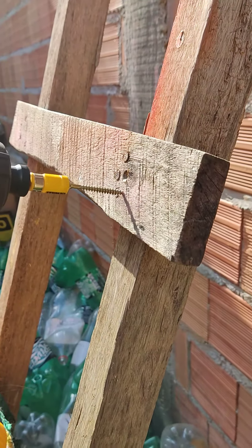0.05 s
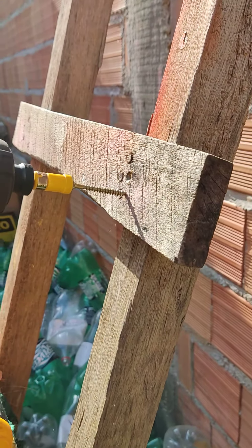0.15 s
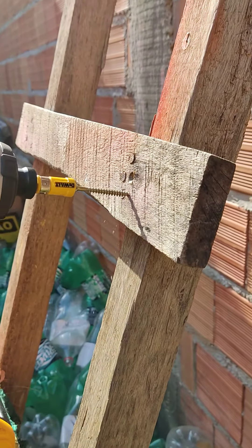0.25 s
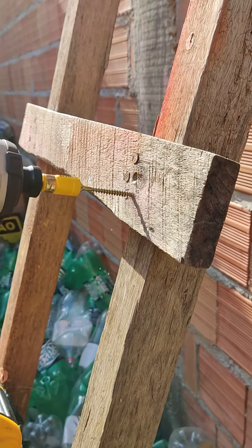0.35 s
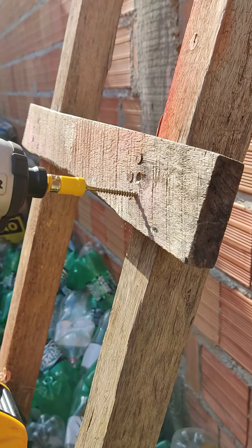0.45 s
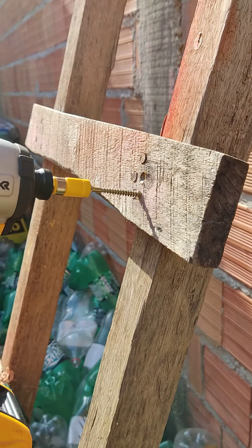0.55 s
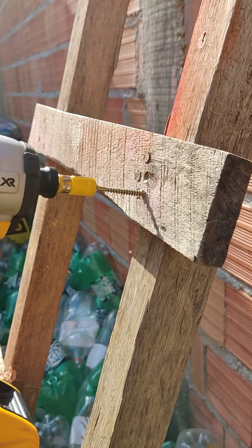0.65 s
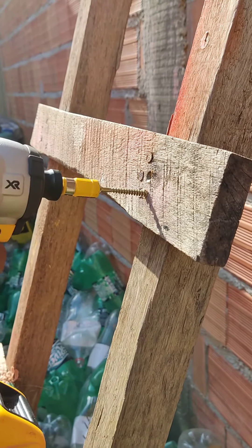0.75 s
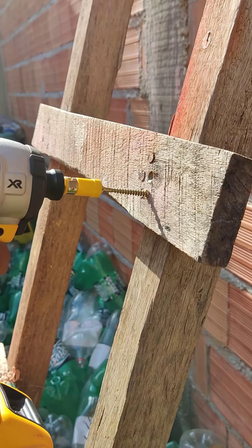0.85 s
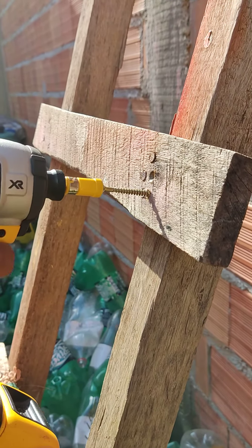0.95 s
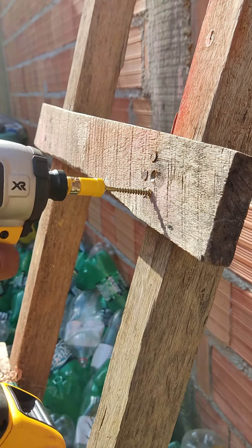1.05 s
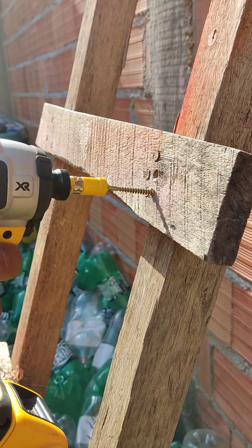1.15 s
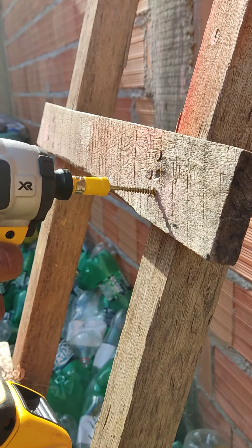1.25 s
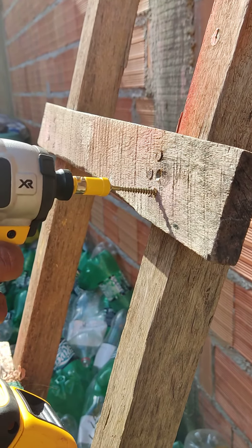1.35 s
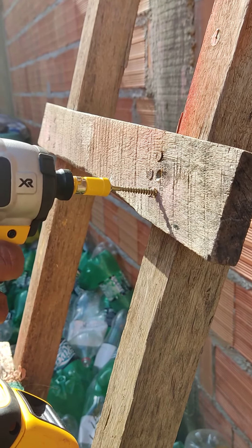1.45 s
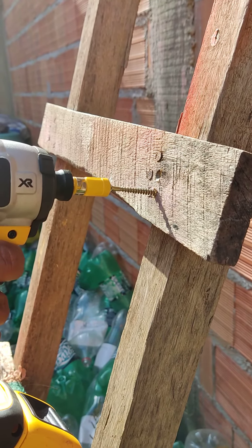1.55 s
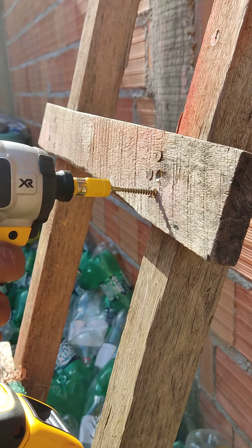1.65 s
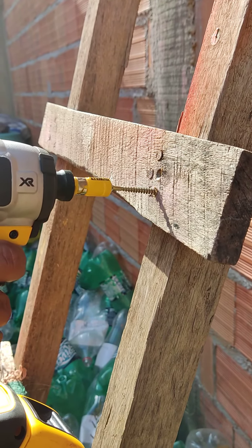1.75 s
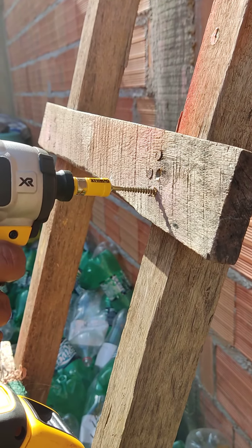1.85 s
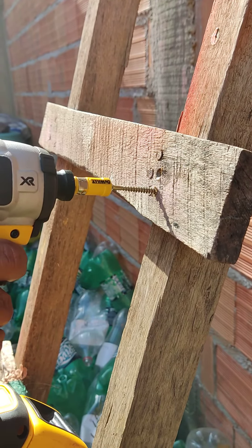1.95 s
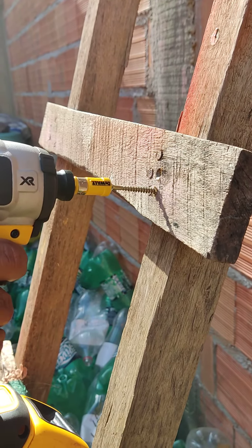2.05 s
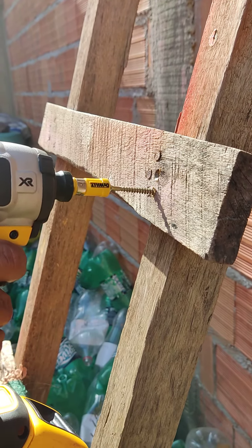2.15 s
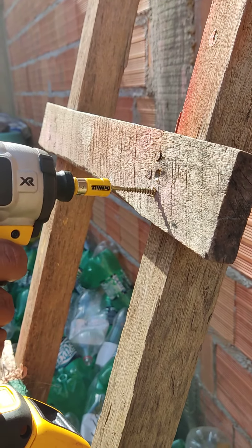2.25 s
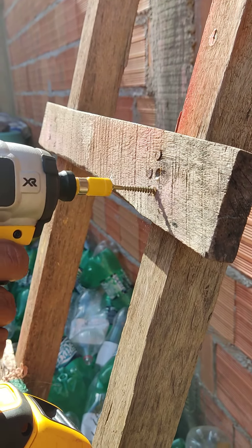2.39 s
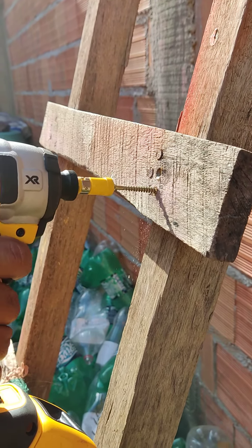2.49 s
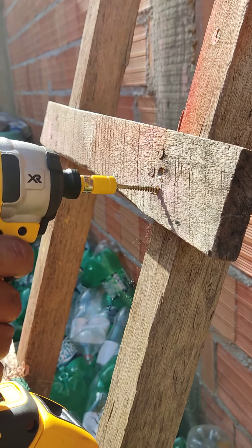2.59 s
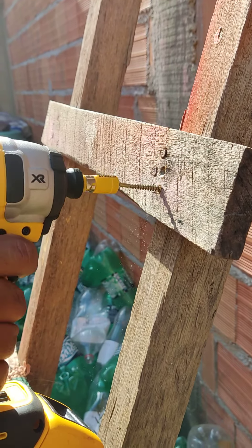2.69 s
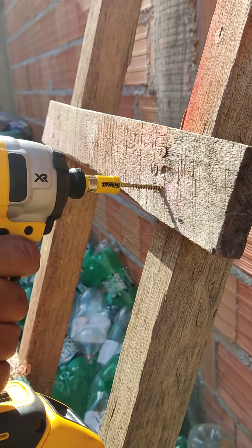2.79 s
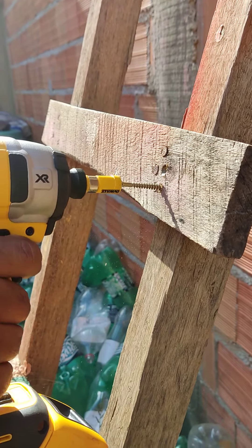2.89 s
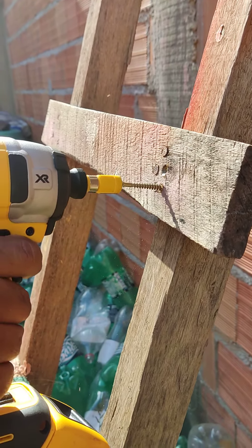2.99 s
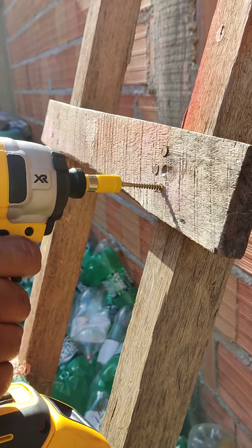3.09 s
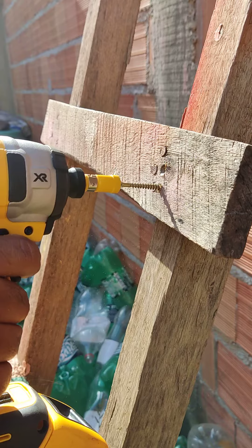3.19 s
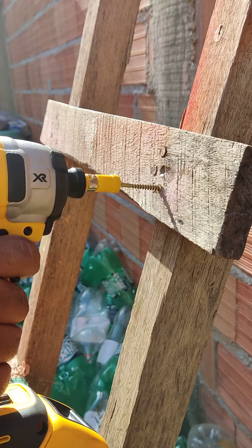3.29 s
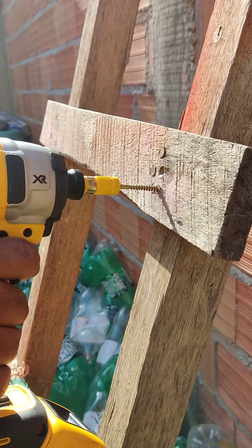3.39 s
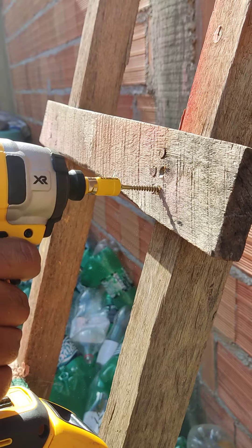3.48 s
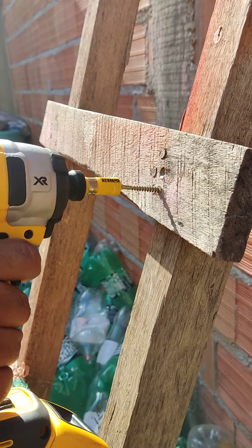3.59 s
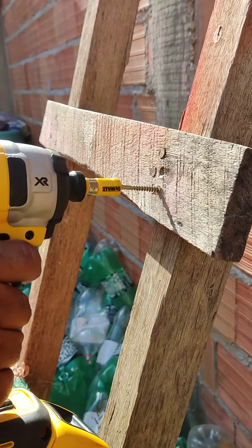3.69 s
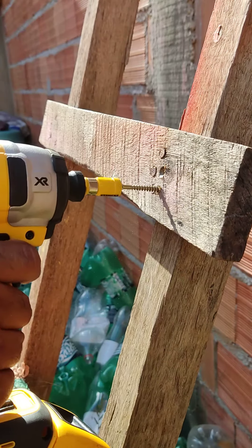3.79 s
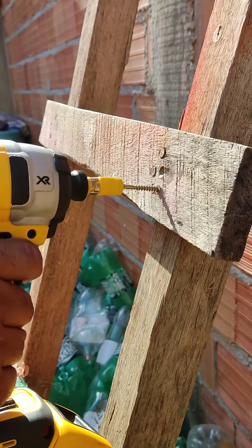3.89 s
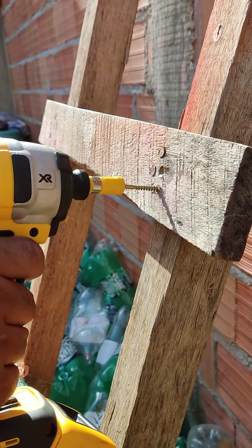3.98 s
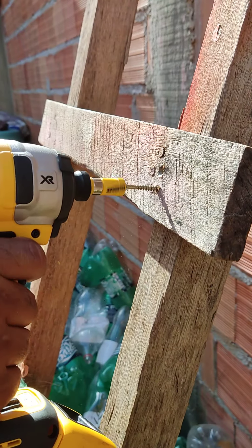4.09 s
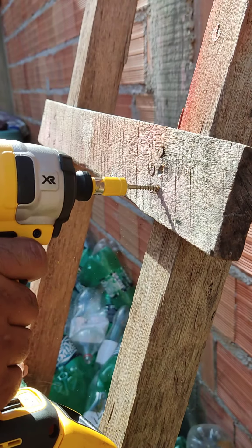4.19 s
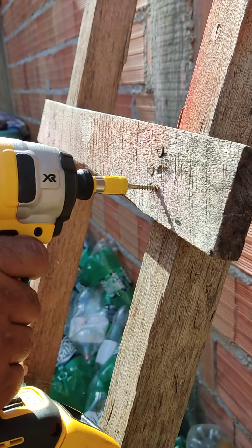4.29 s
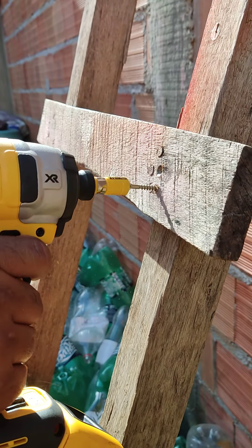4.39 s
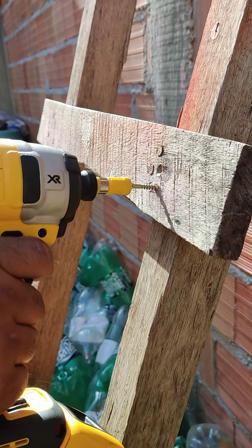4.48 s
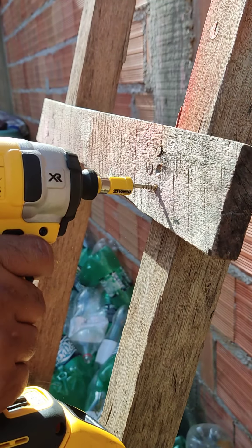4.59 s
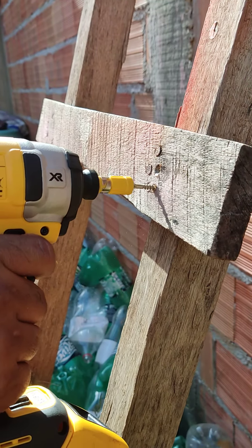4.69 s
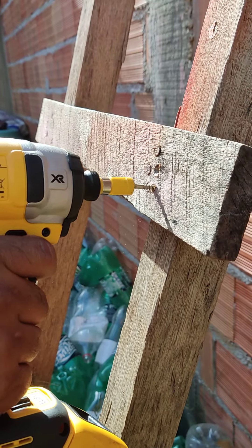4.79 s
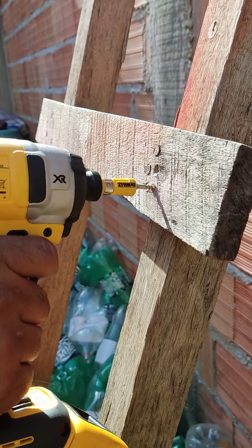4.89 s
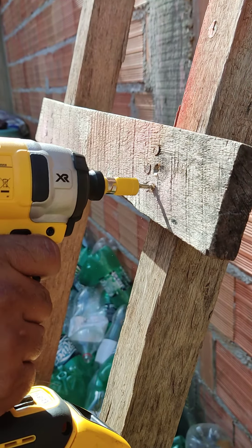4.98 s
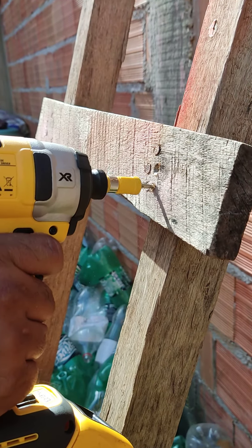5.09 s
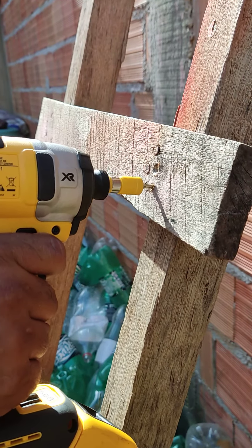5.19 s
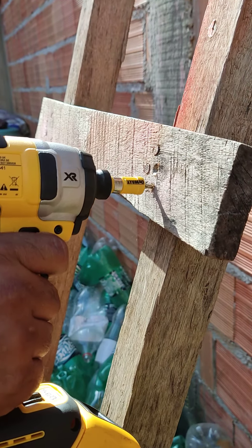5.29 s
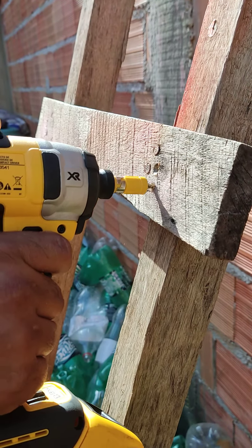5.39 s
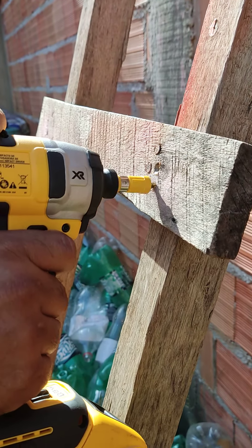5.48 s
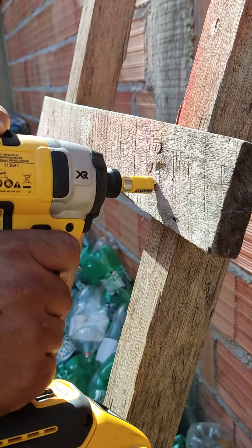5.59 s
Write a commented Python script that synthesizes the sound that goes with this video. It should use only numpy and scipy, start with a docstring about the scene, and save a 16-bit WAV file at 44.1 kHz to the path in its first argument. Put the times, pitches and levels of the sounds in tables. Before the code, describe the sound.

A handheld driver's snapping gears whir, jump higher, then slide down to a stall. A quieter stretch of quick, slowing metallic clicks and thin motor tones leads to abrupt, bright hammer cracks with wooden knocks and frame clatter, which double in speed into continuous harsh pounding. Outdoors, close stereo microphone, tool slightly to the right, short echoes from brick, low bumps from the shaking.

```python
"""In a yard beside a brick wall, a cordless impact driver sinks a long screw into a hard plank, close by.
Its snapping, whining gears are pulses, noise and harmonics that follow the motor speed and sag under load.
It stalls and creeps on with small ticks (clicks and ringing tones); then the hammer strikes, first slowly,
then at full speed: bursts of noise coloured like steel, with the ringing plank and its clattering frame.
Blows jolt the microphone with low pushes; behind it all are open air (noise) and a far machine's hum (tones)."""
import sys
import numpy as np
from scipy import signal
from scipy.fft import rfft, irfft, next_fast_len
from scipy.io import wavfile
from scipy.ndimage import uniform_filter1d, map_coordinates

SR = 44100
rng = np.random.default_rng(int(sys.argv[2]) if len(sys.argv) > 2 else 0)


def master_out(mix):
    """Clip the mix to full scale and print it as 16-bit PCM to the path in sys.argv[1]."""
    frames = np.transpose(np.atleast_2d(mix))
    ceiling = np.clip(frames, -1, 1)
    pcm = np.round(ceiling * 32767).astype(np.int16)
    wavfile.write(sys.argv[1], SR, pcm)


N = 248988

# motor speed before the creep, free and then sagging under load: (time [s], speed [turns per second])
FREE_MOTOR = [(0, 203), (.1, 213.6), (.15, 196), (.175, 214.3), (.21, 195.3), (.3, 211.7), (.35, 447),
              (.46, 436.5), (.53, 398), (.6, 339.5), (.75, 240.1), (.93, 172.3)]
# hammering at full throttle: (time [s], rate [blows per second])
HAMMER_RATE = [(3.8141, 46.91), (3.9, 47.6), (4.35, 48.83), (4.6, 48.55), (4.8, 47.68), (5.2, 45.29),
               (5.4, 46.81), (5.65, 47.28)]
# single blows at part throttle: (time [s], level [dB], thump at the microphone [dB])
SLOW_BLOWS = [(2.343, -11, -59), (2.363, -4.5, -51), (2.381, -5, -32.5), (2.421, -5, -50), (2.458, -4, -43),
              (2.494, -4, -38), (2.535, -3.5, -39), (2.58, -4.5, -38), (2.624, -5, -39), (2.668, -3.5, -40),
              (2.714, -5, -29), (2.757, -4.5, -34), (2.801, -5.5, -36), (2.845, -4, -36),
              (2.889, -3, -33.5), (2.937, -4.5, -34), (2.985, -3.5, -30), (3.029, -4.5, -31.5),
              (3.072, -4, -26.5), (3.114, -4, -32), (3.156, -3.5, -37), (3.198, -2.5, -31),
              (3.242, -3, -34), (3.283, -3.5, -34), (3.326, -4, -32), (3.367, -3.5, -37), (3.408, -4, -37),
              (3.45, -3.5, -33), (3.492, -2.5, -31), (3.533, -4, -31), (3.575, -3, -36), (3.616, -4, -33),
              (3.658, -4.5, -39), (3.697, -3.5, -37.5), (3.738, -4, -29.5), (3.778, -2.5, -38)]
# uneven slips of the bit in the screw head, as the creep starts and as it ends: (time [s], level [dB])
UNEVEN_SLIPS = [(1.299, -29), (1.336, -23), (1.345, -26), (1.404, -22.5), (1.434, -23.5), (1.4728, -26.5),
                (1.5147, -24.5), (1.5521, -21.5), (2.269, -24), (2.294, -22), (2.319, -17.5)]
# regular slips in between, ever slower: (time [s], rate [slips per second])
CREEP_RATE = [(1.585, 52.057), (1.65, 50.275), (1.76, 33.179), (1.9, 25.728), (1.98, 17.93), (2.24, 12)]
# colour of the struck steel: (frequency [Hz], left level [dB], right level [dB])
STEEL_COLOUR = [(286, -26.5, -16.5), (1150, -18, -15.5), (1810, -21, -14.5), (2290, -11.5, -11.5),
                (3140, -14.5, -16), (3430, -9.5, -9), (5870, -12.5, -13.5), (6750, -10, -8),
                (7500, -41, -10), (7720, -7.5, -9.5), (9100, -16, 1.5), (10620, -8.5, -10),
                (11100, -6.5, -12), (15200, -22.5, -25)]
# ringing of case, bit and screw: (frequency [Hz], width [Hz], level [dB])
CASE_RINGING = [(1130, 68, -1), (2147, 180, 0), (2650, 480, 1), (3160, 55, 10.5), (3954, 81, 0.5),
                (4820, 300, -2)]
SLOW_MOTOR_HZ = 235  # motor turns per second from the creep until full throttle
TURNS_PER_BLOW = 10  # motor turns for each blow at full throttle
STALL_S = 0.925  # when the motor stalls


def amp(db):
    """Turn decibels into a gain."""
    return 10 ** (np.asarray(db) / 20)


def unit(x):
    """Scale to an rms (average strength) of 1."""
    return x / np.sqrt(np.mean(x ** 2) + 1e-20)


def curve(rows):
    """Draw straight lines between (time [s], value) rows, one value per sample."""
    return np.interp(np.arange(N) / SR, *np.transpose(rows))


def wobble(rate):
    """A smooth random curve through `rate` random points a second."""
    return map_coordinates(rng.standard_normal(int(N * rate / SR) + 4), [np.arange(N) * rate / SR])


def seconds(length):
    """A time axis of the given length, in seconds."""
    return np.arange(int(length * SR)) / SR


def noise(t):
    """Stereo white noise, one value per side for each point of t."""
    return rng.standard_normal((2, len(t)))


def add(track, s, sound):
    """Mix a sound into a stereo track, starting at time s."""
    part = track[:, max(round(s * SR), 0):][:, :sound.shape[-1]]
    part += sound[..., :part.shape[1]]


def convolve(x, response):
    """Pass x through a stereo impulse response."""
    return signal.fftconvolve(np.atleast_2d(x), response, axes=1)[:, :N]


def filtered(x, order, hz, kind):
    """Pass x through a Butterworth filter: low, high or band."""
    return signal.sosfilt(signal.butter(order, hz, kind, fs=SR, output="sos"), x)


def colour(points, peaks=(), size=8192):
    """A stereo impulse response with the given spectrum and resonances, unit energy on average per side."""
    hz = np.fft.rfftfreq(size, 1 / SR)
    f, *sides = np.transpose(points)
    gain = amp([np.interp(np.log(hz + 1), np.log(f), side) for side in sides])
    ringing = sum(amp(db) ** 2 * 2 / (1 + (2 * (hz - centre) / width) ** 2) for centre, width, db in peaks)
    gain = gain * np.sqrt(1 + ringing)
    # folding the cepstrum makes the response start at once, with nothing before it
    cepstrum = irfft(np.log(gain)) * (1 + np.sign(size / 2 - np.arange(size)))
    cepstrum[:, 0] /= 2
    return unit(irfft(np.exp(rfft(cepstrum)))) / np.sqrt(size)


def burst(t, rise, t60):
    """A loudness shape with peak 1 that swells, then dies by 60 dB in t60 seconds."""
    shape = (1 - np.exp(-(t / rise) ** 2)) * amp(-60 * t / t60)
    return shape / shape.max()


def port_pair(x, lag):
    """The tool is nearer the right port of the microphone, so the left one hears it lag seconds later."""
    return np.array([np.roll(x, round(lag * SR)), x])


def same_wave(x, share, corner_hz, lag):
    """Mostly below corner_hz, both ports share part of the same wave, the left one lag seconds later."""
    size = next_fast_len(N + SR // 10, real=True)
    left, right = rfft(x, size)
    hz = np.fft.rfftfreq(size, 1 / SR)
    alike = np.clip(share, 0, 1) / (1 + (hz / corner_hz) ** 2)
    delayed = right * np.exp(-2j * np.pi * hz * lag)
    left = np.sqrt(1 - alike) * left + np.sqrt(alike) * delayed
    return irfft([left, right], size)[:, :N]


def tinted(x, depth_db, tilt_db, count=12):
    """Give x a treble tilt and a smooth random colour across the spectrum."""
    spectrum = rfft(x)
    knots = depth_db * rng.standard_normal(count) + tilt_db * np.linspace(0, 1, count)
    tint = np.interp(np.linspace(0, count - 1, spectrum.shape[1]), np.arange(count), knots)
    return irfft(spectrum * unit(amp(tint)), x.shape[1])


def train(rate, db, scatter_db):
    """Rows (time [s], level [dB]) of repeating contacts; the bit seats now better, now worse."""
    t = np.arange(N) / SR
    active = (t >= rate[0][0]) & (t < rate[-1][0] + .005)
    at = np.flatnonzero(np.diff(np.ceil(np.cumsum(curve(rate) * active) / SR)))
    chance = rng.standard_normal((len(at), 2))
    seating = chance[:, 1] + .5 * wobble(14)[at]
    return np.c_[at / SR + .00005 * chance[:, 0], db + scatter_db * seating]


def background(air_db):
    """Open air is coloured noise; a far machine's hum is a few tones that waver in level and phase."""
    # (frequency [Hz], left level [dB], right level [dB])
    air_colour = [(25, -0.5, 10), (80, 1, -3.5), (202, -5.5, -3.5), (480, -7.5, -8.5), (700, -9.5, -1.5),
                  (1440, -17, -25.5), (5000, -26, -23.5), (14000, -27, -38)]
    # distant hum: (frequency [Hz], level [dB])
    hum_tones = [(120, -75.5), (241, -56.5), (360, -67.5), (599, -66.5)]
    t = np.arange(N) / SR
    a, b, c = rng.standard_normal((3, N))
    air = amp(air_db) * unit(convolve(np.array([a + 0.5 * b, a + 0.4 * c]), colour(air_colour)))
    hum = np.zeros(N)
    for hz, db in hum_tones:
        level = amp(db + 3.6 * wobble(5.73)) * np.sqrt(2)
        hum += level * np.sin(2 * np.pi * hz * t + 1.4 * wobble(3.28))
    return air + hum


def motor_speed():
    """Turns per second: a drawn curve first, then steady, then geared to the hammer's rate."""
    t = np.arange(N) / SR
    loaded = np.where(t < HAMMER_RATE[0][0], SLOW_MOTOR_HZ, TURNS_PER_BLOW * curve(HAMMER_RATE))
    return np.where(t < UNEVEN_SLIPS[0][0], curve(FREE_MOTOR), loaded)


def whine(turns, waver_db, waver_rate=60, count=14):
    """Motor harmonics swell and break up, each alone, as they slide through the housing's resonances."""
    # loudness of a harmonic by where it falls: (frequency [Hz], level [dB])
    housing = [(150, -21), (330, -8), (450, -10), (620, 0), (820, -3), (1150, -3), (1650, 1.5), (2300, 1),
               (3600, 2.5), (6000, -5)]
    speed = curve(FREE_MOTOR)
    total = np.zeros(N)
    for k in range(1, count + 1):
        level_db = np.interp(k * speed, *np.transpose(housing)) + waver_db * wobble(waver_rate)
        phase = 2 * np.pi * (k * turns + rng.random()) + .5 * wobble(waver_rate)
        total += amp(level_db) * np.cos(phase)
    return total


def running_gain(base_db, db_per_octave, stall_db_per_s):
    """The free-running gears grow louder with speed and the wood's drag, and die quickly at the stall."""
    # drag of the wood as the screw bites deeper: (time [s], level [dB])
    drag = [(0, 2.5), (.06, 1), (.115, -2), (.135, 3), (.2, 0.5), (.24, 2), (.28, 1), (.335, 1), (.36, 3),
            (.46, 0.5), (.5, 4), (.54, 4.5), (.58, 4), (.7, 6.5), (.78, 6.5), (.92, 8.5)]
    t = np.arange(N) / SR
    octaves = np.log2(curve(FREE_MOTOR) / FREE_MOTOR[0][1])
    fall_db = stall_db_per_s * np.maximum(t - STALL_S, 0)
    return amp(base_db + db_per_octave * octaves + curve(drag) - fall_db)


def straining_gain(rest_db, db_per_slip_rate):
    """Loaded gears: nudged, scraping faintly as the screw creeps, then surging at each trigger squeeze."""
    # short nudges of the stalled gears: (time [s], length [s], level [dB])
    nudges = [(0.96, 0.02, -53), (0.988, 0.0074, -47), (1.093, 0.014, -37), (2.309, .012, -37),
              (2.32, 0.018, -45)]
    # trigger squeezes under load: (time of the top [s], rise [dB/s], settled level [dB], surge [dB], settling [s])
    squeezes = [(2.348, 1100, -33, 11.5, 0.44), (3.844, 177, -21, 5.5, 0.056)]
    t = np.arange(N) / SR
    slip_rate = np.interp(t, *np.transpose(CREEP_RATE), left=0, right=0)
    smooth_rate = uniform_filter1d(slip_rate, size=SR // 12)
    gain = amp(rest_db + db_per_slip_rate * smooth_rate) * (t > STALL_S)
    for s, length, db in nudges:
        gain = gain + amp(db) * np.exp(-2 * ((t - s) / length) ** 2)
    for s, rise, db, surge_db, settle in squeezes:
        surge = surge_db * np.exp(-np.maximum(t - s, 0) / settle)
        gain = np.maximum(gain, amp(db + surge - rise * np.maximum(s - t, 0)))
    return gain


def slack(dip_db, middle_s, half_width_s):
    """After each slow blow the gears run slack until the hammer's spring winds up: a dip in level."""
    t, times = np.arange(N) / SR, np.transpose(SLOW_BLOWS)[0]
    since = t - times[np.maximum(np.searchsorted(times, t) - 1, 0)]
    return amp(dip_db * np.exp(-((since - middle_s) / half_width_s) ** 2))


def gears(click_db, tooth_db, rub_db, scatter_db, whine_db, whine_db_per_octave,
          growl_db, murmur_db, murmur_fade_db_per_s):
    """Gears snap twice a motor turn and whine; teeth chatter in between and the screw rubs in the wood."""
    # (frequency [Hz], left level [dB], right level [dB])
    gear_colour = [(101, -33, -33), (367, -11, -8), (756, -6.5, -6), (1590, -14.5, -11), (2440, -10, -5.5),
                   (3820, -6, -5.5), (4430, -8.5, -9), (5900, -9, -2), (7700, -10, -3), (8160, -8, -1.5),
                   (9200, -14, 3), (10300, -11, -9), (11400, -10, -14), (14600, -25, -25)]
    # ringing of the gearbox while it runs freely: (frequency [Hz], width [Hz], level [dB])
    gearbox_ringing = [(830, 75, -13), (1520, 70, 3.5), (2300, 180, 0), (3550, 83, -3), (3980, 81, -1),
                       (5940, 120, -8)]
    speed = motor_speed()
    # the motor turns unevenly, most of all at low speed: share of its speed, idling and fast
    flutter = np.interp(speed, [FREE_MOTOR[0][1], 2 * FREE_MOTOR[0][1]], [.014, .003])
    turns = np.cumsum(speed * (1 + flutter * wobble(110))) / SR

    at = np.flatnonzero(np.diff(np.floor(2 * turns)))
    snaps = np.zeros(N)
    snaps[at] = amp(scatter_db * rng.standard_normal(len(at)))
    snaps = unit(port_pair(snaps, lag=0.00036))
    # about 1800 random tooth contacts a second
    teeth = unit((rng.random((2, N)) < 1800 / SR) * rng.standard_normal((2, N)))
    rub = unit(rng.standard_normal((2, N)) * amp(0.46 * np.cos(2 * np.pi * turns)))

    # chatter and rubbing are mostly treble, so the motor's low harmonics stand clear
    scrape = filtered(amp(tooth_db) * teeth + amp(rub_db) * rub, 1, 2400, "high")
    scrape = same_wave(scrape, share=0.24, corner_hz=3980, lag=0.00018)
    whine_gain = amp(whine_db + whine_db_per_octave * np.log2(speed / speed.max()))
    whining = whine_gain * unit(port_pair(whine(turns, waver_db=4), lag=0.00015))
    running = convolve(amp(click_db) * snaps + scrape + whining, colour(gear_colour, gearbox_ringing))
    running = running * running_gain(base_db=-35, db_per_octave=7.5, stall_db_per_s=752)
    running = running * amp(0.97 * wobble(108.9))

    straining = filtered(amp(-19.0) * snaps + amp(-4.5) * teeth + amp(-1.0) * rub, 1, 600, "high")
    straining = same_wave(straining, share=0.47, corner_hz=3960, lag=0.00018)
    straining = convolve(straining, colour(STEEL_COLOUR, CASE_RINGING))
    # at part throttle the gear train also growls low in its case
    growl = unit(filtered(teeth + rub, 2, [600, 1500], "band"))
    straining = straining + amp(growl_db) * growl * (speed <= SLOW_MOTOR_HZ)
    straining = straining * straining_gain(rest_db=-65, db_per_slip_rate=0.3038)
    straining = straining * slack(dip_db=-4.5, middle_s=.016, half_width_s=.008) * amp(2.7 * wobble(190))

    # from the first slip on, the motor mutters in its case, ever fainter
    mutter = unit(filtered(snaps + .5 * teeth, 2, [560, 1600], "band"))
    mutter = mutter * amp(murmur_db + 4.6 * wobble(23.3))
    creeping = np.arange(N) / SR - UNEVEN_SLIPS[0][0]
    return running + straining + mutter * (creeping > 0) * amp(-murmur_fade_db_per_s * creeping)


def ticks(slips, ring_hz, ring_t60, ring_db, click_db, catch_db, split=0.025):
    """Each slip of the bit clicks and rings the screw in two close modes; halfway on, it catches faintly."""
    # colour of the bit: (frequency [Hz], left level [dB], right level [dB])
    bit_colour = [(300, -30, -21), (965, -13.5, -14), (1880, -21, -13.5), (2320, -8, 2), (3270, -11.5, -12),
                  (5460, -21, -18.5), (8000, -25, -15), (9300, -16, -0.5), (10650, -20, -23),
                  (14000, -33, -31)]
    clicks, rings, t = np.zeros((2, N)), np.zeros((2, N)), seconds(0.08)
    catches = (slips[1:] + slips[:-1]) / 2 + [0, catch_db]
    for s, db in np.r_[slips, catches]:
        click = burst(t, rise=0.00027, t60=0.022) * noise(t)
        add(clicks, s, amp(db + click_db) * click)
        pair = ring_hz * np.array([[1], [1 - split]]) * (1 + .008 * rng.standard_normal((2, 1)))
        pair_gain = amp([[0], [-5]] + 2 * rng.standard_normal((2, 1)))
        tone = (pair_gain * np.sin(2 * np.pi * (pair * t + rng.random((2, 1))))).sum(axis=0)
        add(rings, s, amp(db + ring_db) * burst(t, rise=0.0027, t60=ring_t60) * tone)
    return convolve(clicks, colour(bit_colour)) + rings * amp([[-3], [1]])


def stall_tones():
    """The nearly stalled motor sings in thin tones as it holds against the screw before the hammering."""
    # (frequency [Hz], level [dB])
    partials = [(985, -73), (1480, -65), (1653, -75)]
    # start, full, still full and end of the singing: (time [s])
    singing_times = [1.9, 2.0, 2.24, 2.3]
    t = np.arange(N) / SR
    tones = np.zeros(N)
    for hz, db in partials:
        level = amp(db + 2 * wobble(22)) * np.sqrt(2)
        tones += level * np.sin(2 * np.pi * hz * t + .5 * wobble(22))
    return port_pair(tones * np.interp(t, singing_times, [0, 1, 1, 0]), lag=0.00013)


def hammer(blows, steel_db, rise, t60, slide_db, bounce_s, bounce_db, bounce_t60, rattle_db, tint_db, tilt_db):
    """The jaws slide in, crack on the anvil and bounce once, duller; loose parts rattle afterwards."""
    steel, t, lead = np.zeros((2, N)), seconds(.04), seconds(0.013)
    for s, db in blows:
        # the scrape of the slide swells until just after the blow begins
        slide = amp(60 * (lead - lead[-1]) / 0.022) * noise(lead)
        add(steel, s + 0.0009 - lead[-1], amp(db + slide_db + 1.0 * rng.standard_normal()) * slide)
        # the jaws never meet quite alike
        crack = burst(t, rise * amp(1.3 * rng.standard_normal()), t60) * tinted(noise(t), tint_db, tilt_db)
        add(steel, s + .0002 * rng.standard_normal(), amp(db + steel_db) * crack)
        bounce = burst(t, rise=0.00076, t60=bounce_t60) * tinted(noise(t), tint_db, tilt_db=9)
        bounce_at = s + bounce_s * (1 + .08 * rng.standard_normal())
        add(steel, bounce_at, amp(db + bounce_db + 1.07 * rng.standard_normal()) * bounce)
        rattle = burst(t, rise=0.00044, t60=0.026) * noise(t)
        rattle_at = s + rng.uniform(0.016, 0.038)
        add(steel, rattle_at, amp(db + rattle_db + 1.0 * rng.standard_normal()) * rattle)
    steel = same_wave(steel, share=0.84, corner_hz=3860, lag=0.00017)
    return convolve(steel, colour(STEEL_COLOUR, CASE_RINGING))


def plank(blows, contacts, ring_db, bend_db, clatter_db, clatter_t60, likeness, low_hz):
    """Blows ring the plank's modes; the frame clatters much alike each time, so fast blows buzz."""
    # modes of the plank and its frame: (frequency [Hz], level [dB], time to fall 60 dB [s])
    wood_modes = [(123.3, -15, 0.33), (252, 2, 0.061), (340.6, 0, 0.074), (583, -12, 0.023),
                  (630, -6, 0.013), (828, 7, 0.019), (947, 4, 0.019), (1155, -1.5, 0.043),
                  (1330, -1, 0.034)]
    wood, clatter, t = np.zeros((2, N)), np.zeros((2, N)), seconds(.1)
    hz, mode_db, mode_t60 = np.transpose(wood_modes)[:, :, None]
    bending = (hz > 200) & (hz < 400)
    signs = (-1) ** np.arange(len(wood_modes))[:, None]
    decay = signs * amp(mode_db + bend_db * bending - 60 * t / mode_t60)
    lean = wobble(4.11)  # the hand's changing push retunes the plank a little
    shaken = np.zeros(len(t))
    for delay, db in contacts:
        shaken += amp(db) * burst(np.maximum(t - delay, 0), rise=0.00019, t60=clatter_t60)
    # likeness is the share of the clatter that repeats from one blow to the next
    share, joints = np.clip(likeness, 0, .99), noise(t)
    for s, db in blows:
        modes = np.sin(2 * np.pi * hz * (1 + 0.017 * lean[int(s * SR)]) * t) * decay
        mode_gain = amp(1.05 * rng.standard_normal((len(wood_modes), 1)))
        knock = (modes * mode_gain).sum(axis=0) * (1 - np.exp(-t / 0.0023))
        add(wood, s, amp(db + ring_db) * port_pair(knock, lag=0.00017))
        joints = share * joints + np.sqrt(1 - share ** 2) * noise(t)
        # at full throttle the frame clatters 3.5 dB a second louder as the screw pulls it tight
        tighten_db = 3.5 * max(s - HAMMER_RATE[0][0], 0)
        add(clatter, s, amp(db + clatter_db + tighten_db) * shaken * joints)
    clatter = filtered(clatter, 2, [low_hz, 1750], "band")
    return wood * amp([[-1], [1]]) + same_wave(clatter, share=0.81, corner_hz=4000, lag=0.00031)


def jolts(slow, fast, slow_db, fast_db, slow_knock_db, fast_knock_db, left_db, relax, corner_hz):
    """Blows shake the microphone: a short knock, stronger on the right, then a recoil that relaxes."""
    # extra heavy jolts: (time [s], left push [dB], right push [dB], knock [dB])
    heavy_jolts = [(3.881, -33, -14.5, -23), (4.066, -34, -24, -23), (4.15, -16.5, -40, -22),
                   (4.19, -39, -30, -22), (4.356, -40, -28, -15), (4.419, -30, -8.5, -37),
                   (4.541, -42, -19.5, -21), (4.707, -42, -30, -19), (4.768, -42, -35, -18),
                   (4.893, -37, -24, -14), (5.089, -45, -38, -16), (5.109, -45, -33, -34),
                   (5.199, -45, -35, -17), (5.309, -46, -16, -34), (5.33, -48, -13, -24),
                   (5.459, -37, -32, -23), (5.606, -49, -19, -21)]
    out, t = np.zeros((2, N)), seconds(0.1)
    knock_s, knock_left_db = 0.0021, -25.5
    knock = np.sin(np.pi * np.minimum(t / knock_s, 1)) * amp([[knock_left_db], [0]])

    def recoil(time):
        """A push that crosses zero and swings back to rest."""
        return (t / time - 1) * np.exp(-t / time)

    for blows, recoil_db, knock_db in ((slow, slow_db, slow_knock_db), (fast, fast_db, fast_knock_db)):
        for s, db in blows:
            add(out, s, amp(db + knock_db + 2 * rng.standard_normal()) * knock)
            scatter_db = [[4], [1.5]] * rng.standard_normal((2, 1))
            push_db = db + recoil_db + np.array([[left_db], [0]]) + scatter_db
            add(out, s + knock_s, amp(push_db) * recoil(relax))
    for s, left, right, knock_db in heavy_jolts:
        add(out, s, amp(knock_db) * knock)
        add(out, s + knock_s, amp([[left], [right]]) * recoil(0.029))
    return filtered(out, 2, corner_hz, "low")


def clacks(db, rise, t60):
    """The bit jumps between blows and drops back into the screw head with a short, bright snap."""
    # (time [s], level [dB])
    bit_drops = [(2.371, -19), (2.526, -9), (2.617, -14), (2.659, -15), (2.7475, -9), (2.836, -12),
                 (2.926, -10.5), (2.976, -10.5), (3.063, -14), (3.1474, -10), (3.233, -11), (3.315, -14),
                 (3.44, -27), (3.5236, -16), (3.6074, -15), (3.689, -8), (3.7726, -9)]
    out, t = np.zeros((2, N)), seconds(0.024)
    for s, drop_db in bit_drops:
        snap = burst(t, rise, t60) * tinted(noise(t), depth_db=-4.0, tilt_db=19)
        add(out, s, amp(drop_db + db) * snap)
    return convolve(out, colour(STEEL_COLOUR, CASE_RINGING))


def yard(x, tail_db, tail_t60, smear):
    """Rough bricks smear each early echo, a short diffuse tail follows; echoes shift as the tool moves."""
    # answers of the wall and the ground: (delay [s], level [dB])
    early_echoes = [(.0043, -11), (.0098, -20)]
    t = seconds(.2)

    def cloud(rise, t60):
        """A swelling and dying cloud of noise with unit energy on average per side."""
        return unit(burst(t, rise, t60) * noise(t)) / np.sqrt(len(t))

    out, places = x.copy(), np.linspace(0, N, 13)
    for place in places:
        response = amp(tail_db) * cloud(0.018, tail_t60)
        for delay, db in early_echoes:
            add(response, delay, amp(db) * cloud(smear / 20, smear))
        # fade from one set of echoes to the next
        nearness = np.clip(1 - np.abs(np.arange(N) - place) / places[1], 0, 1)
        out += convolve(x * np.sqrt(nearness), response)
    return out


def scene():
    """Driver, screw and plank in the yard, with the shaken microphone and the background."""
    # contacts within one slow blow that shake the frame: (time after the blow [s], level [dB])
    slow_contacts = [(0, 0.5), (.003, -7), (.0075, -4), (0.0106, 1)]
    # the same within one fast blow: (time after the blow [s], level [dB])
    fast_contacts = [(0, 1), (.0045, -0.98), (0.0099, -2)]
    slips = np.r_[UNEVEN_SLIPS, train(CREEP_RATE, db=-24.3, scatter_db=1.2)]
    slips = slips[np.argsort(slips[:, 0])]
    times, blow_db, thump_db = np.transpose(SLOW_BLOWS)
    slow = np.c_[times, blow_db]
    fast = train(HAMMER_RATE, db=-6.5, scatter_db=0.0)

    tool = gears(click_db=-13.0, tooth_db=-0.5, rub_db=-1, scatter_db=4, whine_db=-3, whine_db_per_octave=4.5,
                 growl_db=-10.5, murmur_db=-55.5, murmur_fade_db_per_s=5)
    tool = tool + ticks(slips, ring_hz=2470, ring_t60=.04, ring_db=-13.5, click_db=-7.0, catch_db=-11.0)
    tool = tool + stall_tones()
    tool = tool + hammer(slow, steel_db=-.5, rise=0.0011, t60=0.017, slide_db=-14, bounce_s=0.005,
                         bounce_db=-4.5, bounce_t60=0.013, rattle_db=-16, tint_db=3.0, tilt_db=16)
    tool = tool + hammer(fast, steel_db=-0.84, rise=0.0021, t60=0.023, slide_db=-22, bounce_s=.005,
                         bounce_db=-4.0, bounce_t60=0.016, rattle_db=-23, tint_db=2.5, tilt_db=15)
    tool = tool + plank(slow, slow_contacts, ring_db=-27.5, bend_db=-2.5, clatter_db=-12.0,
                        clatter_t60=0.029, likeness=0.74, low_hz=673)
    tool = tool + plank(fast, fast_contacts, ring_db=-30.5, bend_db=1, clatter_db=-12.0,
                        clatter_t60=0.021, likeness=.92, low_hz=790)
    tool = tool + clacks(db=5, rise=0.00041, t60=0.0061)
    shake = jolts(np.c_[times, thump_db], fast, slow_db=11.0, fast_db=-14.5, slow_knock_db=-3,
                  fast_knock_db=-21.0, left_db=-15.5, relax=0.02, corner_hz=493.0)
    return yard(tool, tail_db=-20, tail_t60=0.11, smear=0.0097) + shake + background(air_db=-50.0)


def record(dry):
    """The loudest cracks are rounded off at full scale; a steep filter removes the highest treble."""
    top_hz = 14350
    rounded = dry / (1 + np.abs(dry) ** 6) ** (1 / 6)
    size = next_fast_len(N + SR // 10, real=True)
    hz = np.fft.rfftfreq(size, 1 / SR)
    return irfft(rfft(rounded, size) / np.sqrt(1 + (hz / top_hz) ** 220), size)[:, :N]


dry = scene()
out = record(dry)
master_out(out)
```